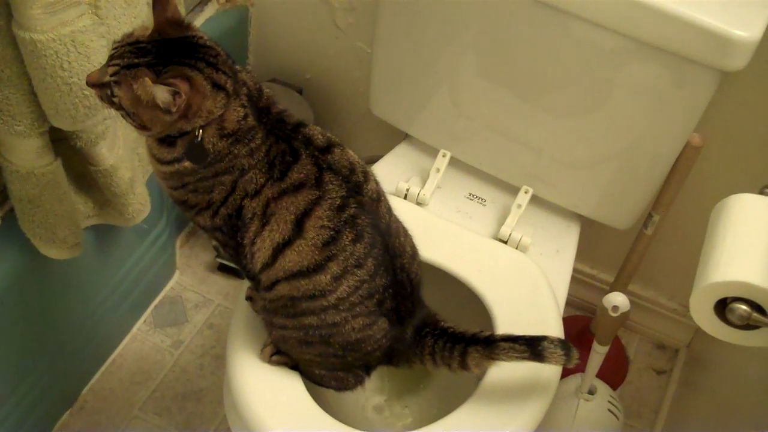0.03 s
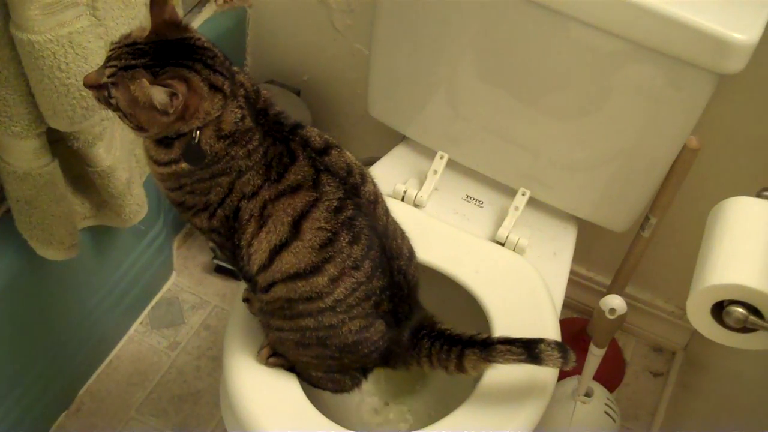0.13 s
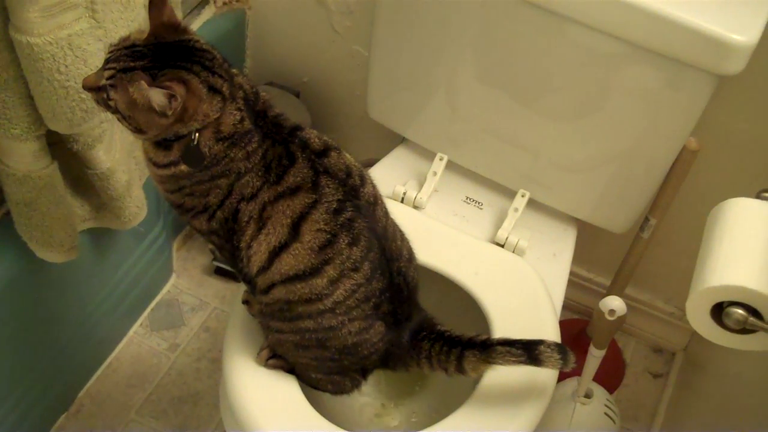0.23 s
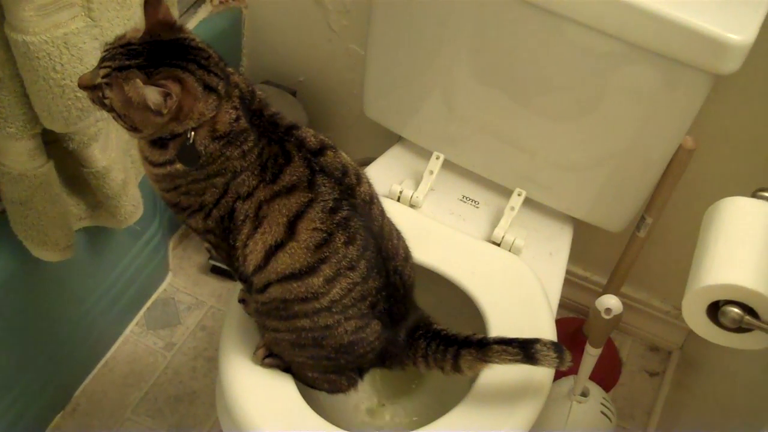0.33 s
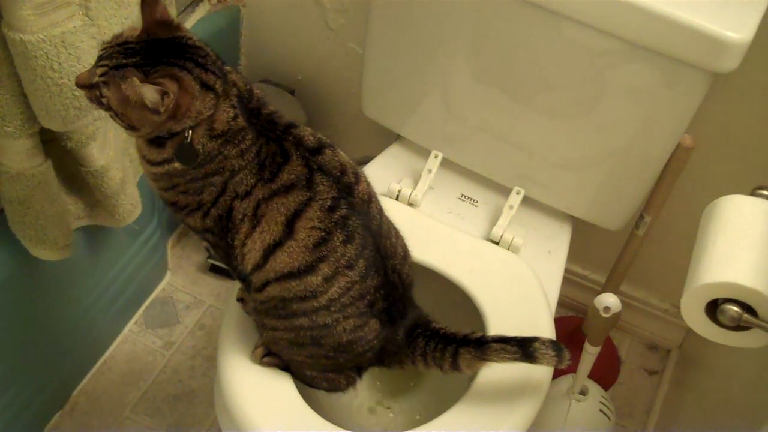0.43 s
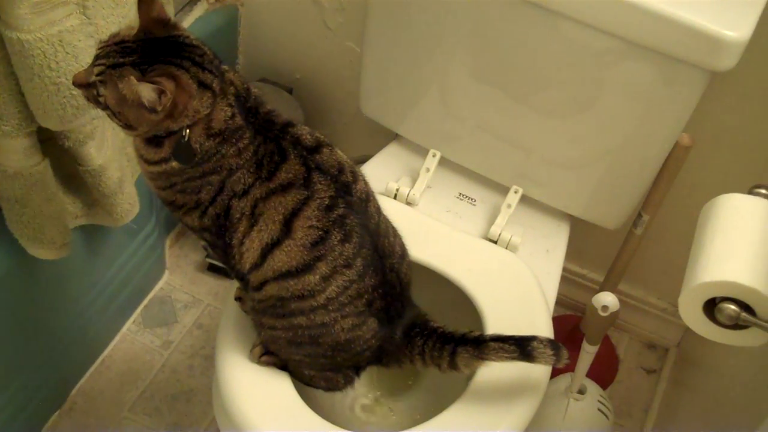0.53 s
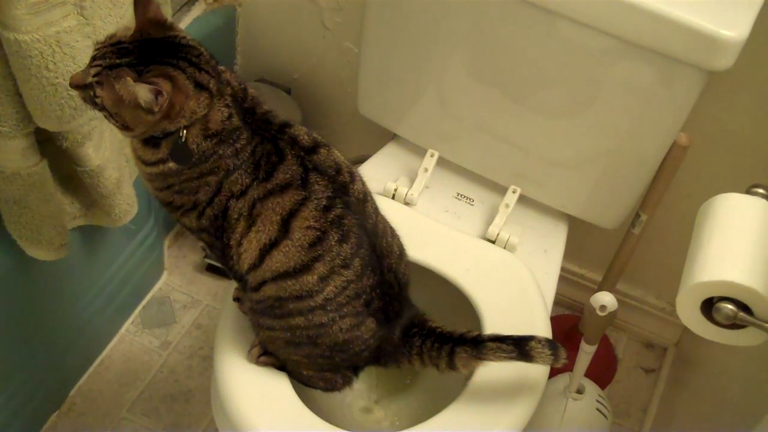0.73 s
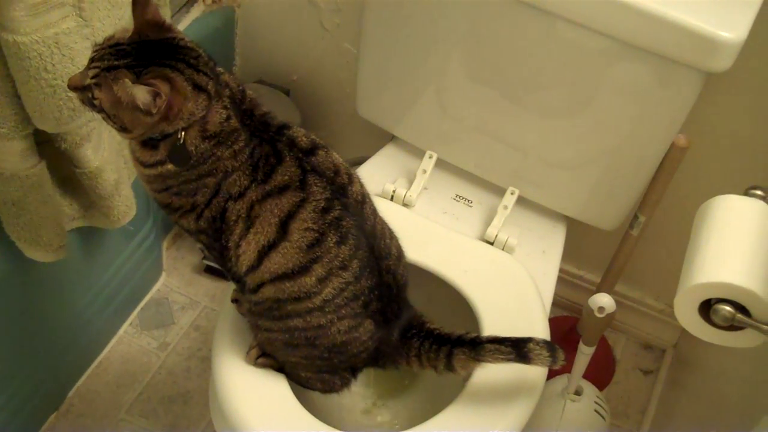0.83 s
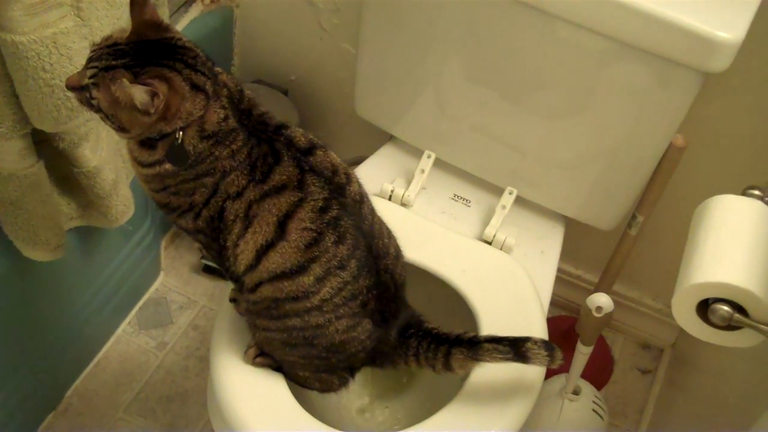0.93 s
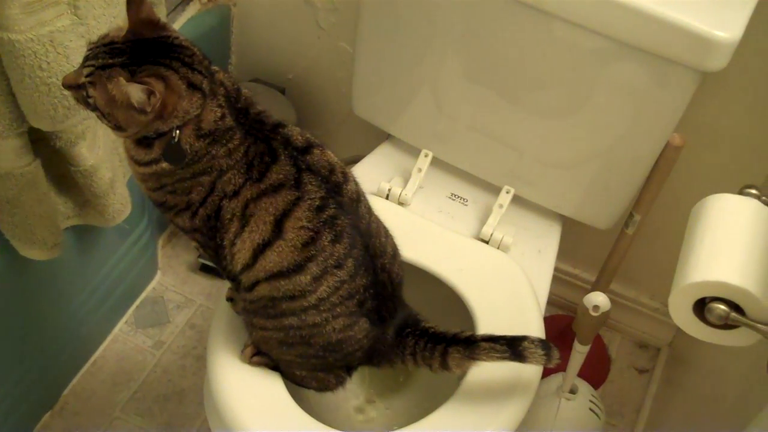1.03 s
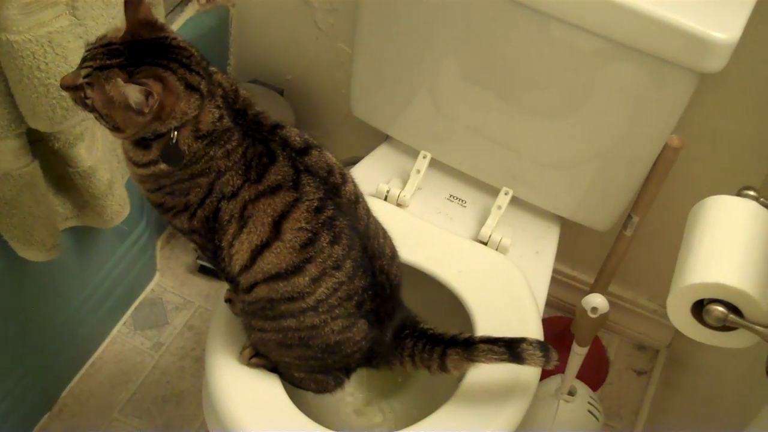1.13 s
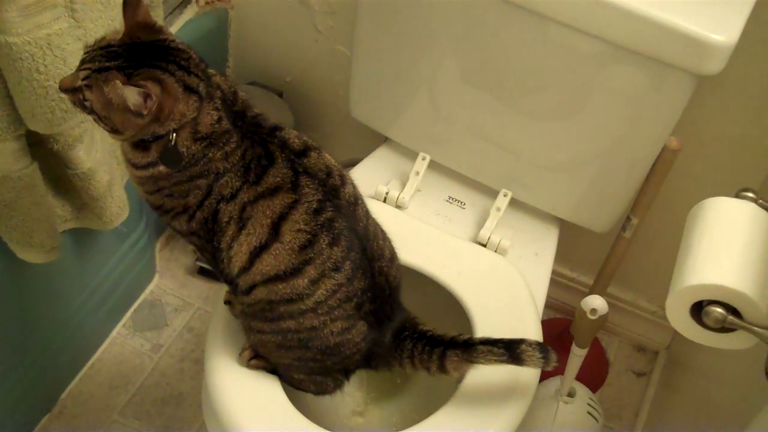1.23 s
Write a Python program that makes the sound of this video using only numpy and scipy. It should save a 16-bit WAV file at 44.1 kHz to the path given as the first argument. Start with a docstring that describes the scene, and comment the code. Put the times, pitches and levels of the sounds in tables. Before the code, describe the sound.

A cat's thin stream dribbles into toilet water for just over a second, heard from about a metre above. The clearest plop comes near 0.1 seconds. Small bright splashes and bubbly drips follow unevenly, with sharper ones around 0.6 and 0.7 seconds, continuing to the end with a faint fizz of droplets. The porcelain bowl and small hard bathroom briefly prolong each drop, over faint room noise.

```python
"""Small plops and bright splashes: a cat's thin stream dribbles into the water of a toilet bowl,
about a metre below the microphones. Drops slap the surface and trap air: bubbles ring, or chirp
upward as they surface and open, and stray droplets add a faint fizz. The porcelain bowl and a
small hard bathroom prolong each sound, over faint room noise, hum and a thin electrical whine."""
import sys
import numpy as np
from scipy import signal
from scipy.fft import rfft, irfft
from scipy.io import wavfile

SR = 44100
rng = np.random.default_rng(int(sys.argv[2]) if len(sys.argv) > 2 else 0)


def put_to_file(sound):
    """Save the sound as 16-bit audio at rate SR, in the file named by the first command-line argument."""
    columns = np.atleast_2d(sound).T  # one column per channel
    safe = np.clip(columns, -1, 1)
    whole_steps = np.round(safe * 32767)
    wavfile.write(sys.argv[1], SR, whole_steps.astype(np.int16))


N = 57330

# trapped bubbles (time [s], pitch [Hz], level [dB], decay [ms], pitch rise per decay time [share],
# left minus right [dB])
BUBBLES = [ (0.000, 1462, -33.5, 9.6, 0.0072, -1), (0.032, 925, -44, 17, 0.02, -2),
           (0.102, 3370, -44.5, 2, 0.017, 1), (0.1336, 2084, -18, 4.2, 0.12, 0),
           (0.193, 1254, -53, 37, 0.0092, -2.5), (0.247, 1078, -40, 4.7, 0.072, -1.5),
           (0.2973, 8120, -29.5, 1.6, 0.022, 8), (0.395, 7310, -32, 3.2, 0.025, 3),
           (0.401, 1250, -47.5, 15, 0.004, -4), (0.419, 1258, -45.5, 15, 0.004, -4),
           (0.464, 1255, -51, 14, 0.004, -4), (0.4492, 8820, -30, 0.7, 0.016, -1),
           (0.481, 1029, -42, 7.8, 0.042, -4.5), (0.502, 1187, -40.5, 11, 0.0058, -3.5),
           (0.524, 1242, -42.5, 8.8, 0.013, -3), (0.554, 1190, -55, 8, 0.02, 7),
           (0.578, 1256, -48.5, 10, 0.0026, -5), (0.577, 5920, -23.5, 2.1, 0.036, -3),
           (0.576, 6720, -30, 2.3, 0.035, -8), (0.595, 1756, -46.5, 13.7, 0.064, -4),
           (0.649, 1055, -39.5, 6.8, 0.029, -6), (0.7208, 4856, -25, 1.7, 0.037, 1),
           (0.729, 1360, -44, 8.4, 0.015, 1), (0.771, 1017, -39.5, 2.9, 0.019, -3.5),
           (0.811, 4060, -33, 1.97, 0.07, 0.5), (0.8736, 1431, -36.5, 7, 0.069, 1),
           (0.9, 1423, -43, 15, 0.005, 0.5), (1.0137, 10510, -30.5, 2.9, 0.018, 3),
           (1.0315, 7310, -36, 3.4, 0.014, 4), (1.034, 1986, -44, 6.9, 0.014, 0),
           (1.0837, 7420, -30.5, 1.6, 0.0068, 4), (1.079, 1242, -45, 19, 0.017, -3.5),
           (1.1195, 6710, -35, 3.5, 0.028, -9), (1.138, 1130, -40.5, 18, 0.048, -3.5),
           (1.229, 1201, -46, 8, 0.012, -2), (1.235, 7700, -29, 1.4, 0.026, 9)]
# surfacing bubbles (time [s], start pitch [Hz], end pitch [Hz], length [ms], level [dB])
CHIRPS = [ (0.1330, 1700, 2400, 3.5, -28.5), (0.1395, 2372, 2750, 4.4, -19.5),
          (0.143, 3060, 3780, 9.4, -37), (0.307, 1720, 3060, 7.5, -43), (0.540, 2220, 4020, 4.28, -37),
          (0.569, 2060, 3170, 6.1, -43.5), (0.603, 1990, 2890, 12.6, -45.5), (0.628, 1900, 2300, 10, -43.5),
          (0.642, 2420, 3780, 11.2, -51.5), (0.6975, 1700, 2945, 5.57, -38), (0.7035, 2600, 3480, 3.7, -34),
          (0.805, 1660, 4170, 4.2, -51.5), (0.870, 1490, 2550, 5.7, -45), (0.883, 1820, 2900, 7.7, -41),
          (0.936, 2830, 4420, 5.9, -43.5), (0.948, 2010, 3170, 9, -44), (1.032, 3250, 4640, 6.2, -43.5),
          (1.076, 1323, 2070, 8.8, -37.5), (1.167, 1664, 2560, 10.3, -41.5), (1.27, 2450, 3670, 7.2, -49)]
# drops slapping the water (time [s], level [dB], centre [Hz], decay [ms])
SLAPS = [ (0.001, -42, 8460, 17.5), (0.1335, -30.5, 6470, 5.1), (0.1344, -37, 2370, 9),
         (0.1736, -45, 6600, 31), (0.294, -43.5, 5500, 15), (0.298, -31, 8400, 1.2),
         (0.321, -36.5, 9200, 3.7), (0.3685, -34, 14500, 1.1), (0.386, -38.5, 6550, 5.7),
         (0.391, -47.5, 3550, 4.8), (0.3993, -32.5, 10300, 2.6), (0.466, -42.5, 4000, 2.9),
         (0.626, -38.5, 6600, 4.7), (0.701, -43.5, 7540, 7.3), (0.7205, -24.5, 7150, 2.7),
         (0.735, -37.5, 6400, 1.5), (0.8088, -28.5, 13300, 0.77), (0.8952, -40, 7900, 8.5),
         (0.94, -45.5, 6500, 3.8), (0.972, -39.5, 7140, 3.5), (1.03, -38, 7650, 4.5),
         (1.121, -40.5, 6640, 2.1), (1.184, -45, 5840, 4.3), (1.2345, -31.5, 8800, 1.2)]
# tone of the water heard through the bowl's opening (frequency [Hz], gain [dB])
OPENING_EQ = [(500, -19), (1100, -2), (1600, -3), (2400, 1.5), (3400, 1), (4000, -5), (4800, -4.5),
              (8000, 1.5), (11000, -10.5), (14000, -19.5)]
# ringing of the bowl's cavity (pitch [Hz], relative level [dB])
BOWL_MODES = [(1127, 2), (1274, 11), (1454, 8), (2137, 0), (2193, 0), (2775, 1), (2977, 2)]
# first echoes from bowl, tank and walls (left delay [ms], right delay [ms], level [dB])
ECHOES = [(2.3, 2.3, -8), (7.3, 7.35, -7.5), (14.6, 13, -8.5)]
# bands of the bathroom's reverb tail (frequency [Hz], time to fall 60 dB [s], relative level [dB])
TAIL_BANDS = [(300, 0.85, 13), (1220, 0.38, 3.5), (2240, 0.33, -5), (4050, 0.36, 2), (6960, 0.28, -1),
              (14300, 0.32, -4)]
# spectrum of the room noise (frequency [Hz], relative level [dB])
AIR_EQ = [(25, -12), (60, -2), (125, 0), (450, 4), (800, 0), (2000, 0.5), (4500, -6.5), (7600, -3.5),
          (10000, -12.5), (14000, -13)]
# swell of the hum (time [s], level [dB])
HUM_SWELL = [(0, -79), (.95, -69.5), (1.2, -62)]
# tone of the duller right microphone (frequency [Hz], gain [dB])
RIGHT_MIC_EQ = [(100, -3), (900, -5), (2500, -1), (4000, 1.5), (6200, 0), (7000, -18.5), (7700, -3.5),
                (9000, -20), (12000, -1.5), (14000, -7)]

BUBBLE_ATTACK_CYCLES, CHIRP_SKEW = 0.36, 0.96
WOBBLE_DEPTH, WOBBLE_CYCLES = 0.57, 12.37  # cycles of ringing in a typical waver
SMALL_RISE = 0.11  # pitch rise per decay time in gurgle and spray, as a share
SLAP_WIDTH_OCTAVES, SLAP_SKIRT_DB = 0.49, -30  # the splash's band and the broad base under it
TICK_DB, TICK_MS, TICK_HZ = -0.5, 0.39, 12900  # tick of first contact; it thins out below this pitch
GURGLE_DB, GURGLE_TRAIL_S, GURGLE_OCTAVES, GURGLE_DECAY_CYCLES = -10.5, 0.055, 1.19, 3.7
SPRAY_PER_S, SPRAY_FLOOR_DB, SPRAY_SPREAD_DB = 78, -58, 4.5
SPRAY_LOW_HZ, SPRAY_HIGH_HZ, SPRAY_DECAY_CYCLES = 4900, 11800, 6
BOWL_GAIN_DB, BOWL_T60_S = 1, 0.42
TAIL_GAIN_DB, TAIL_BUILD_S, ALIKE_BELOW_HZ = 1.5, 0.0016, 3280
AIR_DB, HUM_HZ, WHINE_HZ, WHINE_DB = -53.5, 131, 11808, -73
TOP_CUT_HZ = 14300


def bubbles():
    """Large trapped bubbles plop, tiny ones tink; each has its own place between left and right."""
    out = np.zeros((2, N))
    for s, hz, db, decay_ms, rise, pan_db in BUBBLES:
        ring = bubble_ring(hz, decay_ms / 1000, rise)
        ring = ring * wobble(len(ring), hz)
        add(out[0], s, ring * undb(db))
        add(out[1], s, ring * undb(db - pan_db))
    return out


def bubble_ring(hz, decay_s, rise):
    """A pocket of air rings down, its pitch creeping up as it nears the surface."""
    t = np.arange(int(7 * decay_s * SR) + 2) / SR
    pitch = np.minimum(hz * (1 + rise * t / decay_s), SR / 2)
    attack = 1 - np.exp(-t * hz / BUBBLE_ATTACK_CYCLES)
    return np.sin(2 * np.pi * np.cumsum(pitch) / SR) * attack * np.exp(-t / decay_s)


def wobble(size, hz):
    """A bubble's level wavers as it changes shape, each bubble at its own rate."""
    start, pace = rng.random(2)
    waver_hz = (.5 + pace) * hz / WOBBLE_CYCLES
    return 1 + WOBBLE_DEPTH * np.sin(2 * np.pi * (start + waver_hz * np.arange(size) / SR))


def chirps():
    """A bubble at the surface swells, sweeps upward and stops as it opens."""
    out = np.zeros(N)
    for s, start_hz, end_hz, length_ms, db in CHIRPS:
        progress = np.linspace(0, 1, int(length_ms * SR / 1000))
        pitch = start_hz * (end_hz / start_hz) ** progress
        sweep = np.sin(2 * np.pi * np.cumsum(pitch) / SR)
        swell = np.sin(np.pi * progress ** CHIRP_SKEW)
        add(out, s, undb(db) * swell * sweep * wobble(len(sweep), start_hz))
    return out


def slaps():
    """Each drop hits with a tick, then a short, bright splash that has little bass."""
    out, size = np.zeros(N), 4096
    ms = np.arange(size) / SR * 1000
    hz = np.fft.rfftfreq(size, 1 / SR)
    tick_fade = np.exp(-ms / TICK_MS)
    spectra = rfft(even_noise(channels=len(SLAPS), size=size, frame=128))
    for (s, db, centre_hz, decay_ms), spectrum in zip(SLAPS, spectra):
        offset = np.log2((hz + 1) / centre_hz) / SLAP_WIDTH_OCTAVES
        band = np.exp(-.5 * np.where(offset < 0, offset ** 4, offset ** 2))  # steeper on the bass side
        skirt = undb(SLAP_SKIRT_DB) * np.minimum(hz / centre_hz, 1)
        splash = irfft(spectrum * (band + skirt))
        envelope = (1 - tick_fade) * np.exp(-ms / decay_ms)  # opens as the tick dies
        tick = irfft(spectrum * np.minimum(hz / TICK_HZ, 1) ** 2) * tick_fade
        add(out, s, undb(db) * (splash / splash.std() * envelope + undb(TICK_DB) * tick))
    return out


def gurgle():
    """Each surfacing bubble sheds a trail of small ones near its own pitch, later ones fainter."""
    out = np.zeros(N)
    for s, start_hz, end_hz, _, db in CHIRPS:
        for lateness, pitch in rng.random(size=(6, 2)):
            hz = np.sqrt(start_hz * end_hz) * 2 ** (GURGLE_OCTAVES * (pitch - .5))
            ring = bubble_ring(hz, GURGLE_DECAY_CYCLES / hz, SMALL_RISE)
            add(out, s + lateness * GURGLE_TRAIL_S, undb(db + GURGLE_DB) * np.exp(-lateness) * ring)
    return out


def spray():
    """Stray droplets make a faint fizz of small bubbles."""
    out, count = np.zeros(N), 200
    for when, pitch, faintness in rng.random((count, 3)):
        s = when * count / SPRAY_PER_S
        hz = SPRAY_LOW_HZ * (SPRAY_HIGH_HZ / SPRAY_LOW_HZ) ** pitch
        db = SPRAY_FLOOR_DB - SPRAY_SPREAD_DB * np.log(faintness + 0.013)  # a few stand out
        if s < N / SR:
            add(out, s, undb(db) * bubble_ring(hz, SPRAY_DECAY_CYCLES / hz, SMALL_RISE))
    return out


def bowl_ring():
    """The cavity of the porcelain bowl rings on at a few fixed pitches."""
    t = np.arange(N) / SR
    damping = np.log(1000) / BOWL_T60_S
    modes = sum(undb(db + BOWL_GAIN_DB) * np.cos(2 * np.pi * hz * t) for hz, db in BOWL_MODES)
    return modes * np.exp(-damping * t) * 2 * damping / SR


def first_arrivals():
    """The direct sound, then quick echoes off bowl, tank and walls."""
    out = np.zeros((2, N))
    out[:, 0] = 1
    for left_ms, right_ms, db in ECHOES:
        add(out[0], left_ms / 1000, undb([db]))
        add(out[1], right_ms / 1000, undb([db]))
    return out


def bathroom_tail():
    """Hard walls blur the echoes into a diffuse tail that lasts longest in the bass."""
    t = np.arange(N) / SR
    hz = np.fft.rfftfreq(N, 1 / SR)
    spectrum = rfft(diffuse(even_noise(channels=2, size=N, frame=1024)))
    tail = np.zeros((2, N))
    for centre_hz, t60, db in TAIL_BANDS:
        band = curve([(row[0], row[0] == centre_hz) for row in TAIL_BANDS], hz)  # neighbours crossfade
        fade = np.exp(-np.log(1000) * t / t60) * (1 - np.exp(-t / TAIL_BUILD_S))
        tail += undb(db + TAIL_GAIN_DB) * irfft(spectrum * band, N) * fade / np.linalg.norm(fade)
    return tail


def room_tone():
    """Soft room noise, a low hum that grows and a thin electrical whine."""
    t = np.arange(N) / SR
    air = equalise(diffuse(rng.standard_normal((2, N))), AIR_EQ)
    hum_db = np.interp(t, *np.array(HUM_SWELL).T)
    hum = undb(hum_db) * np.sin(2 * np.pi * HUM_HZ * t)
    whine = undb(WHINE_DB) * np.sin(2 * np.pi * WHINE_HZ * t)
    return undb(AIR_DB) * air / air.std() + hum + whine


def diffuse(noise):
    """Sound from all sides at two close microphones: alike in the bass, unrelated in the treble."""
    hz = np.fft.rfftfreq(N, 1 / SR)
    alike = 0.61 / (1 + (hz / ALIKE_BELOW_HZ) ** 4)
    mid = rfft(noise[0]) * np.sqrt((1 + alike) / 2)
    side = rfft(noise[1]) * np.sqrt((1 - alike) / 2)
    return irfft([mid + side, mid - side], N)


def even_noise(channels, size, frame):
    """Noise whose energy is spread evenly over time and pitch, in frames of `frame` samples."""
    noise = rng.standard_normal((channels, size))
    for _ in range(4):
        phase = np.angle(signal.stft(noise, nperseg=frame)[2])
        noise = signal.istft(np.exp(1j * phase), nperseg=frame)[1][:, :size]
    return noise / noise.std()


def equalise(sound, points):
    """Filter by a curve of (frequency [Hz], gain [dB]) points."""
    gain = undb(curve(points, np.fft.rfftfreq(2 * N, 1 / SR)))
    return irfft(rfft(sound, 2 * N) * gain)[..., :N]


def curve(points, hz):
    """Read (frequency [Hz], value) points on a log-frequency axis."""
    point_hz, values = np.array(points, float).T
    return np.interp(np.log(hz + 1), np.log(point_hz), values)


def add(track, s, sound):
    """Mix a sound into the track at s seconds."""
    start = int(np.clip(s * SR, 0, N - 1))
    track[start:start + len(sound)] += sound[:N - start]


def undb(db):
    """Decibels to gain."""
    return 10 ** (np.asarray(db) / 20)


def scene():
    """The water sounds pass through bowl and bathroom, over a bed of room tone."""
    water = equalise(bubbles() + chirps() + gurgle() + slaps() + spray(), OPENING_EQ)
    space = first_arrivals() + bowl_ring() + bathroom_tail()
    return signal.fftconvolve(water, space, axes=1)[:, :N] + room_tone()


def record(dry):
    """Two microphones, the right one duller, and a steep top cut."""
    heard = np.array([dry[0], equalise(dry[1], RIGHT_MIC_EQ)])
    top_cut = signal.ellip(8, .2, 70, TOP_CUT_HZ, fs=SR, output="sos")
    return signal.sosfilt(top_cut, heard)


dry = scene()
out = record(dry)
put_to_file(out)
```